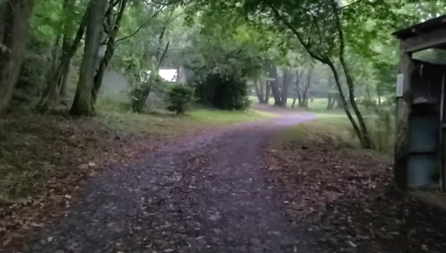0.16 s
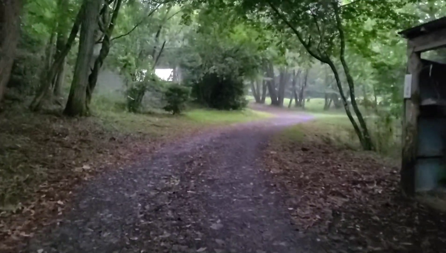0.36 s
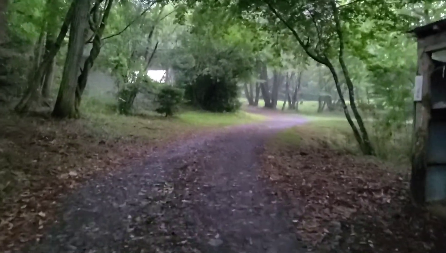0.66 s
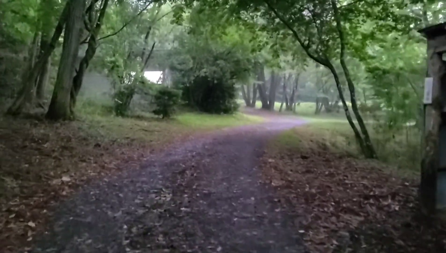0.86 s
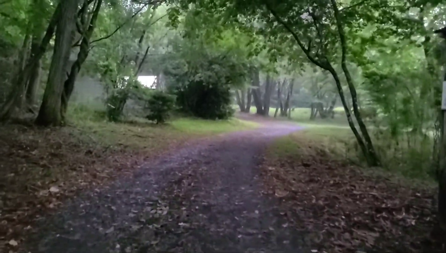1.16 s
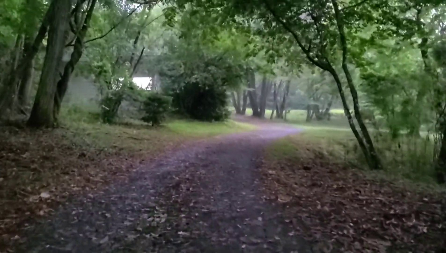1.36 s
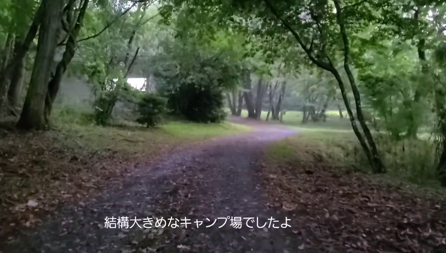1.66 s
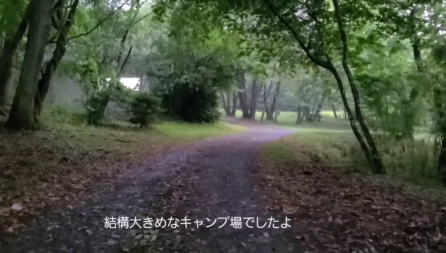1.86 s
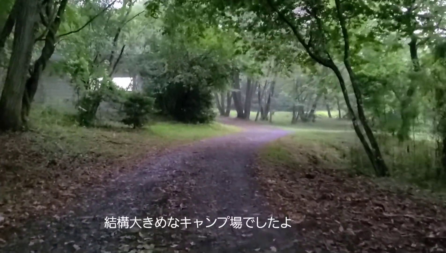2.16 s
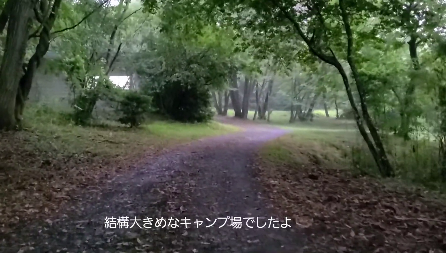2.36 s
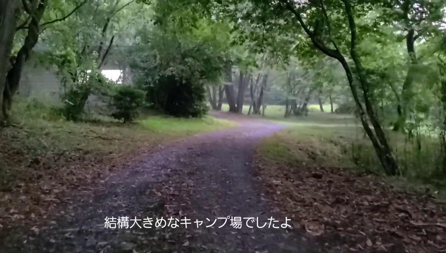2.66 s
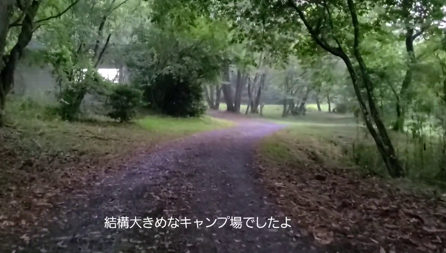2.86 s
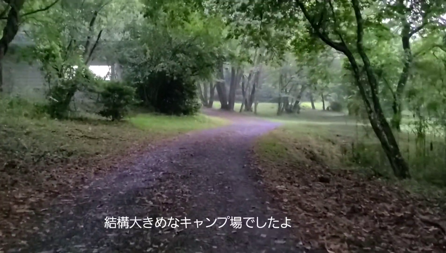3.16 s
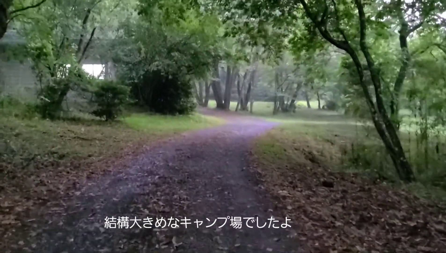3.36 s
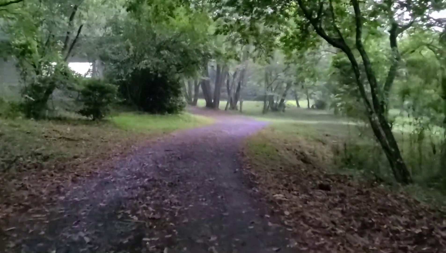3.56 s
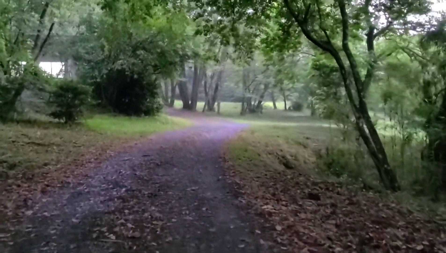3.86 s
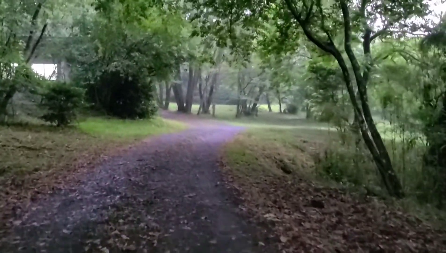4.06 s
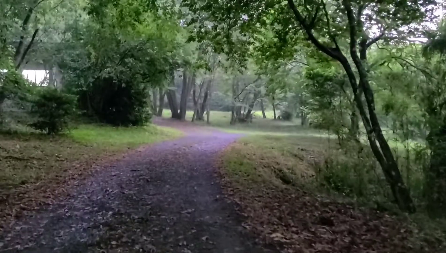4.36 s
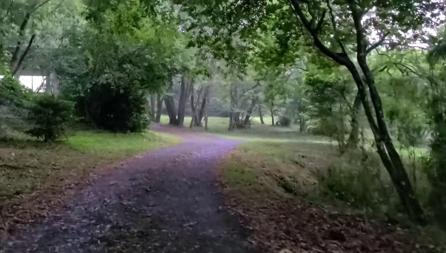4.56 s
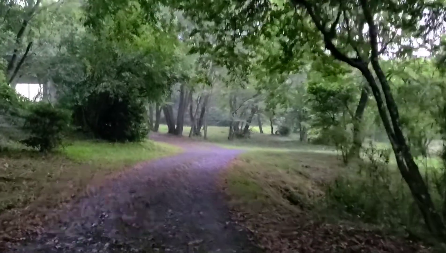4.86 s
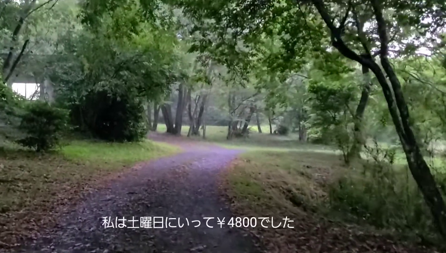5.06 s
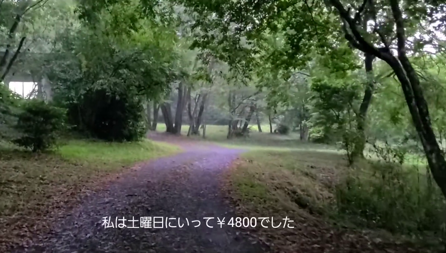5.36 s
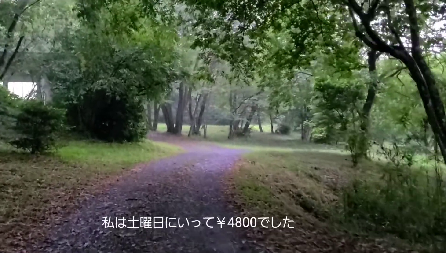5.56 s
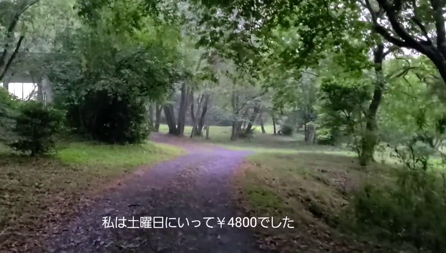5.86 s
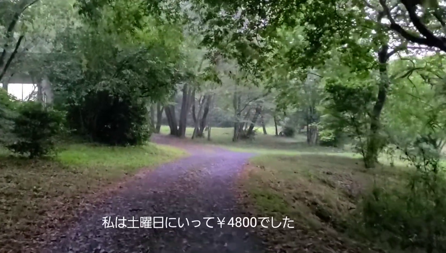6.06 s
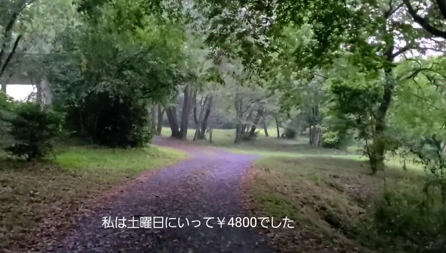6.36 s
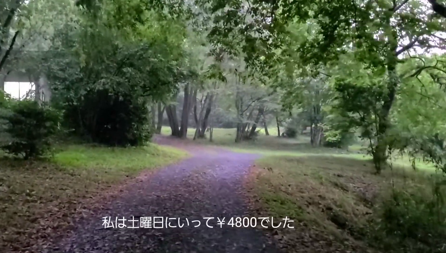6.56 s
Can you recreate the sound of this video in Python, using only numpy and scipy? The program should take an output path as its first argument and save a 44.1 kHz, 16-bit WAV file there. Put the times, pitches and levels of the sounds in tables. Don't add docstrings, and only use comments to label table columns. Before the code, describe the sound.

Shrill cicadas dominate from beginning to end, leaning slightly left, while a walker treads a leafy gravel path. First come light clicks, then a heavier crunch and a hard stone knock at about three seconds, then more scattered steps. A rapid high pulsing insect surges soon after. Quiet rising bird whistles echo briefly among trees over faint leaf noise and low traffic. Handheld stereo microphone outdoors.

```python
import sys
import numpy as np
from scipy import signal
from scipy.fft import rfft, irfft
from scipy.io import wavfile

SR = 44100
rng = np.random.default_rng(int(sys.argv[2]) if len(sys.argv) > 2 else 0)


def natural_amplitude(level_db):
    exponent = np.asarray(level_db, float) / 20
    return 10 ** exponent


def unload_wav(signal):
    wavfile.write(
        sys.argv[1],
        SR,
        np.round(np.clip(np.atleast_2d(signal).T, -1, 1) * 32767).astype(np.int16),
    )


N = 296352

# freq_hz, density_db_per_hz
HUM_SPECTRUM = [(12, -42), (20, -11.5), (65, -4), (84, -3), (140, -24.5), (180, -44), (310, -120)]
# freq_hz, density_db_per_hz
WOOD_SPECTRUM = [(71, -32), (120, -2.5), (176, -6.5), (432, -4.5), (918, -4), (1140, -1.5), (1490, -3),
                 (2130, 2), (3600, -1.5), (4680, -46), (7920, -120)]
# freq_hz, density_db_per_hz
CHORUS_SPECTRUM = [(1940, -29), (3300, -20.5), (3720, -15.5), (4330, -10.5), (4680, -5), (5900, 1),
                   (6960, -4.5), (8320, -17), (8660, -17), (8950, -20), (9940, -15.5), (11500, -9.5),
                   (13900, -4.5), (15400, -9), (16000, -39.5)]
# time_s, level_db
CHORUS_SWELL = [
    (0, -2),
    (3, -1.5),
    (4, 0),
    (6, -0.5),
    (6.72, -0.5),
]
# freq_hz, side_minus_mid_db
SIDE_MINUS_MID = [(25, -13), (60, -10), (150, -14.5), (380, -10.5), (950, 1), (2380, 0.5), (15000, -0.5)]
# freq_hz, left_minus_right_db
LEFT_MINUS_RIGHT = [(60, -1.0), (130, 1), (290, 1), (640, 2), (1410, 1.5), (3100, 4.5), (6820, 5.5),
                    (15000, 4)]
# start_s, length_s, first_hz, level_db
RISING_WHISTLES = [(.2, .17, 1850, -59), (.85, .17, 2250, -59), (.84, .23, 1520, -54),
                   (.98, .13, 1900, -58), (1.45, .12, 1800, -57), (2.22, .11, 1950, -52),
                   (2.33, .12, 1600, -59), (2.63, .12, 1750, -54), (3.16, .12, 2000, -57),
                   (3.24, .14, 2350, -56), (3.39, .13, 1880, -53), (3.74, .19, 1680, -53),
                   (4.38, .07, 1900, -59), (4.49, .08, 1900, -59), (4.59, .08, 1900, -57),
                   (4.92, .11, 1900, -55), (5.21, .125, 1850, -53), (5.52, .25, 1950, -53),
                   (5.84, .11, 1800, -53), (6.63, .09, 2250, -54)]
# start_s, length_s, pitch_hz, level_db
HELD_WHISTLES = [(.83, .08, 3180, -58), (2.36, .06, 1600, -59), (2.98, .06, 1980, -56),
                 (3.24, .05, 1900, -56), (3.25, .04, 2420, -56), (3.42, .05, 2700, -58),
                 (3.33, .06, 2230, -55), (3.36, .05, 3550, -57), (3.2, .06, 2900, -58),
                 (3.27, .1, 1580, -62), (4.73, .19, 3830, -54), (4.98, .12, 1690, -55),
                 (5.41, .09, 1770, -55), (6.02, .13, 3920, -57), (6.23, .21, 1690, -60),
                 (6.25, .19, 3370, -56), (6.46, .09, 1880, -60)]
# time_s, extra_load_db
FOOT_PRESSES = [
    (0.05, 2.5),
    (1.3, -5),
    (2.98, 4.5),
    (3.22, 5.5),
    (3.5, 6),
    (4.36, -0.5),
    (5.15, 1),
    (5.4, 2.5),
    (5.9, 4.5),
    (6.34, 0),
]
# start_s, peak_db, pitch_hz
STONE_CLICKS = [(0.533, -29, 1320), (0.71, -32.5, 646), (1.229, -29.5, 703), (1.28, -28, 1080),
                (1.332, -27.5, 1260), (1.472, -33, 820), (1.974, -33.5, 1026), (2.104, -34, 1440),
                (2.421, -43.5, 344), (2.961, -30, 735), (3.037, -26, 1380), (3.109, -19.5, 1440),
                (3.13, -11.5, 1470), (3.46, -28.5, 1150), (3.483, -35.5, 459), (3.509, -40, 1090),
                (3.637, -29, 1160), (3.772, -33.5, 958), (4.147, -39, 340), (4.762, -31.5, 750),
                (4.886, -32, 933), (5.272, -25.5, 1130), (5.329, -37, 470), (5.355, -27.5, 1180),
                (5.452, -31.5, 600), (5.48, -33, 603), (6.025, -18, 1310), (6.349, -30.5, 1510),
                (6.411, -28, 1150), (6.623, -28, 1350)]
# start_s, peak_db, pitch_hz
HEEL_THUDS = [
    (0.057, -52, 111),
    (1.333, -47, 172),
    (1.801, -51, 237.7),
    (2.961, -40, 184),
    (3.618, -45, 261),
    (4.512, -49, 132),
    (5.338, -44.5, 149),
    (6.425, -55, 110),
]
# start_s, peak_db
STONE_CHIPS = [
    (0.7094, -28),
    (1.3334, -40),
    (3.4588, -24),
    (4.7187, -33),
    (5.3284, -31),
    (1.229, -39),
    (6.026, -33),
    (5.4813, -23),
]
# time_s, clicks_per_s, level_db
HIGH_SINGER = [
    (0, 360, -37),
    (1.8, 390, -39.5),
    (2.5, 460, -40),
    (3.5, 350, -44),
    (3.75, 393, -32),
    (4.2, 386, -35),
    (4.8, 387.7, -36),
    (5.4, 370, -39),
    (6.72, 392, -40),
]
# time_s, clicks_per_s, level_db
FIRST_SINGER = [
    (0, 396, -36.5),
    (.8, 396, -35.5),
    (1.6, 395, -39),
    (2.4, 394, -42),
    (3.2, 393, -53.5),
    (6.72, 392, -68),
]
# time_s, clicks_per_s, level_db
SECOND_SINGER = [
    (0, 394, -41),
    (1.2, 397, -44),
    (2.2, 393.3, -38.5),
    (3.2, 396.7, -36.5),
    (4.2, 388.8, -37),
    (5.2, 385.8, -37.5),
    (6, 387.4, -39),
    (6.72, 389.2, -37),
]


def rms_one(x):
    return x / np.sqrt(np.mean(x ** 2) + 1e-20)


def in_time(rows):
    time_s, *columns = np.transpose(rows)
    return [np.interp(np.arange(N) / SR, time_s, column) for column in columns]


def at_hz(points, hz):
    points_hz, points_db = np.transpose(points)
    return np.interp(np.log(hz), np.log(points_hz), points_db)


def drift(rate_hz):
    pole = np.exp(-2 * np.pi * rate_hz * 40 / SR)
    noise = rng.standard_normal(N // 40 + 2002)
    slow = signal.lfilter([1], [1, -2 * pole, pole * pole], noise)[2000:]
    return np.interp(np.arange(N) / 40, np.arange(len(slow)), rms_one(slow))


def band(x, low_hz, high_hz, order=2):
    return signal.sosfilt(signal.butter(order, [low_hz, high_hz], "band", fs=SR, output="sos"), x)


def trees(x, t60_s, wet_db):
    age_s = np.arange(int(t60_s * SR)) / SR
    tails = rng.standard_normal((2, SR))[:, :len(age_s)] * natural_amplitude(-60 * age_s / t60_s)
    tails = natural_amplitude(wet_db) * tails / np.sqrt(np.sum(tails ** 2, axis=1, keepdims=True))
    tails[:, 0] = 1
    return signal.fftconvolve(np.broadcast_to(x, (2, N)), tails, axes=1)[:, :N]


def diffuse(spectrum, patchy_db, count):
    hz = np.maximum(np.fft.rfftfreq(N, 1 / SR), 1)
    mid, side = rfft(rng.standard_normal((2, N))) * natural_amplitude(at_hz(spectrum, hz))
    side = side * natural_amplitude(at_hz(SIDE_MINUS_MID, hz))
    balance = natural_amplitude(at_hz(LEFT_MINUS_RIGHT, hz) * [[.5], [-.5]])
    ears = np.array([mid + side, mid - side]) * balance
    place = np.interp(np.log(hz), np.log([spectrum[0][0], spectrum[-1][0]]), [0, count - 1])
    out = np.zeros((2, N))
    for k in range(count):
        part = irfft(ears * np.clip(1 - abs(place - k), 0, 1), N)
        out += part * natural_amplitude(patchy_db * (0.46 * drift(1.0) + drift(16.0)))
    return out / np.sqrt(np.mean(out.mean(0) ** 2))


def traffic_hum(load_db):
    mean_db, gust_db, load_share = -57, 3, 0.63
    level_db = mean_db + load_share * load_db + gust_db * drift(1.5)
    return natural_amplitude(level_db) * diffuse(HUM_SPECTRUM, patchy_db=0.6, count=2)


def wood_air():
    return natural_amplitude(-48.5) * diffuse(WOOD_SPECTRUM, patchy_db=2.5, count=7)


def far_chorus():
    level_db = -33 + in_time(CHORUS_SWELL)[0]
    return natural_amplitude(level_db) * diffuse(CHORUS_SPECTRUM, patchy_db=0.93, count=8)


def bird():
    top_hz, hold_climb, bend = 3200, 1.005, 2.0
    notes = [(*row, top_hz) for row in RISING_WHISTLES]
    notes += [(*row, hold_climb * row[2]) for row in HELD_WHISTLES]
    out, shaky, trill = np.zeros(N), drift(120.0), drift(80.0)
    for start_s, length_s, first_hz, level_db, last_hz in notes:
        at = int(start_s * SR)
        along = np.linspace(0, 1, int(length_s * SR))[:N - at]
        here = slice(at, at + len(along))
        climb = (last_hz / first_hz) ** along ** bend
        hz = first_hz * climb * (1 + .018 * shaky[here])
        phase = 2 * np.pi * np.cumsum(hz) / SR
        fades = np.clip(np.minimum(5 * along, 20 - 20 * along), 0, 1)
        tone = np.sin(phase) + natural_amplitude(-14) * np.sin(2 * phase)
        note = fades * hz / first_hz * natural_amplitude(4 * trill[here]) * tone
        out[here] += natural_amplitude(level_db + 2) * rms_one(note)
    return trees(out, t60_s=.45, wet_db=3) * natural_amplitude([[.6], [-.6]])


def foot_load():
    t_s, spread_s = np.arange(N) / SR, .07
    return sum(db * np.exp(-((t_s - at_s) / spread_s) ** 2) for at_s, db in FOOT_PRESSES)


def grit_crunch(load_db):
    level_db = -56 + load_db
    press_db = level_db - np.median(level_db)
    sizes = natural_amplitude(3 * np.minimum(rng.exponential(1, N), 3)) * rng.choice([-1, 1], N)
    grains_per_s = 250 * natural_amplitude(1.5 * press_db)
    grains = sizes * (rng.random(N) < grains_per_s / SR)
    dealt = rng.integers(0, 4, N)
    grit = np.zeros(N)
    for k, low_hz in enumerate([235, 396, 720, 1130]):
        grit += band(grains * (dealt == k) + 1e-18, low_hz, 2.1 * low_hz)
    return natural_amplitude(level_db - 5) * trees(rms_one(grit), t60_s=.06, wet_db=-4)


def stones_and_heels():
    chip_hz, left_db, spread_db = 2150, 1.5, 1.5
    hits = STONE_CLICKS + HEEL_THUDS + [(start_s, db, chip_hz) for start_s, db in STONE_CHIPS]
    out = np.zeros((2, N))
    for (start_s, peak_db, hz), chance in zip(hits, rng.standard_normal(len(hits))):
        turns = np.arange(-2.5, 4, hz / SR)
        width_turns = np.where(turns < 0, .45, .85)
        pulse = np.exp(-(turns / width_turns) ** 2) * np.sin(-2 * np.pi * turns)
        at = max(int((start_s + 0.00322 - 2.73 / max(hz, 500)) * SR), 0)
        pan_db = (left_db + spread_db * chance) * np.array([[.5], [-.5]])
        out[:, at:at + len(turns)] += pulse[:N - at] * natural_amplitude(peak_db - 1.1 + pan_db)
    return trees(out, t60_s=.07, wet_db=-10)


def throb_phase():
    start_turns, throbs_per_s = .08, 12.82
    return 2 * np.pi * (start_turns + throbs_per_s * np.arange(N) / SR)


def membrane(clicks_per_s, body_hz, ring_s, flip, wander):
    clicks = np.cumsum(clicks_per_s * (1 + wander * drift(24.92))) / SR
    index = clicks.astype(int)
    age_s = clicks % 1 / clicks_per_s
    force = natural_amplitude(rng.normal(0, 2.4, 4000))[index] * (1 - 2 * flip * (index % 2))
    return force * age_s * np.exp(-age_s / ring_s) * np.sin(2 * np.pi * body_hz * age_s)


def high_cicada():
    clicks_per_s, level_db = in_time(HIGH_SINGER)
    phase = throb_phase()
    swell = (.5 + .5 * np.cos(phase)) ** 1.8 * natural_amplitude(0.3 * drift(6.0))
    body_hz = 13950 + 300 * np.sin(phase)
    ears = np.array([membrane(clicks_per_s, body_hz, 2.3e-4, False, wander=.007) for ear in range(2)])
    buzz = trees(rms_one(ears) * swell, t60_s=0.022, wet_db=-9)
    return natural_amplitude(level_db) * buzz * natural_amplitude([[5.0], [-1.5]])


def near_cicada(rows, flip, throb_db):
    clicks_per_s, level_db = in_time(rows)
    paths = np.array([membrane(clicks_per_s, 5500, 6e-5, flip, wander=.0055) for path in range(4)])
    body = band(paths[:2] + paths[2:], 4540, 7000, order=7)
    pumping_db = throb_db * np.cos(throb_phase() + 0.099) + 1.3 * drift(27.0)
    buzz = trees(body, t60_s=.02, wet_db=-11)
    return natural_amplitude(level_db + pumping_db) * rms_one(buzz) * natural_amplitude([[3.8], [-3.8]])


def scene():
    load_db = foot_load()
    background = traffic_hum(load_db) + wood_air() + far_chorus() + bird()
    steps = grit_crunch(load_db) + stones_and_heels()
    first = near_cicada(FIRST_SINGER, flip=True, throb_db=-0.8)
    second = near_cicada(SECOND_SINGER, flip=False, throb_db=2.0)
    return background + steps + high_cicada() + first + second


def roll_off(x):
    return signal.sosfilt(signal.butter(12, 15780, fs=SR, output="sos"), x)


def record(dry):
    low_pass = signal.ellip(12, .5, 70, 15570, fs=SR, output="sos")
    mix = signal.sosfilt(low_pass, dry)
    return roll_off(mix)


dry = scene()
out = record(dry)
unload_wav(out)
```